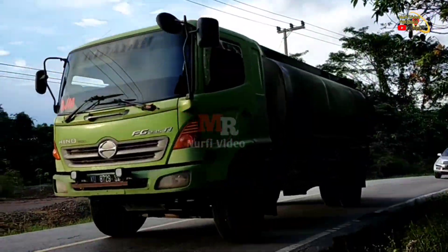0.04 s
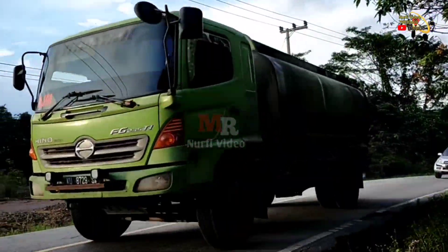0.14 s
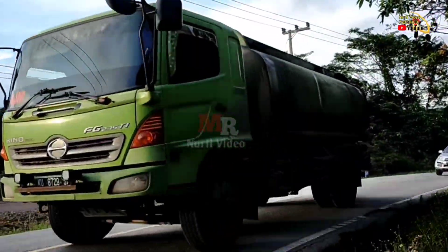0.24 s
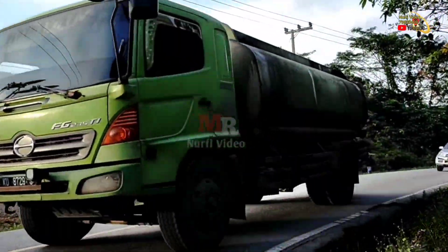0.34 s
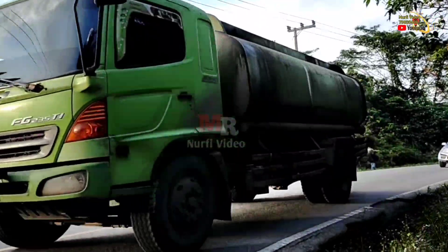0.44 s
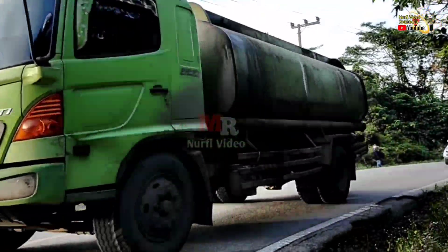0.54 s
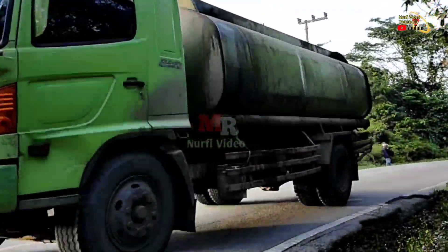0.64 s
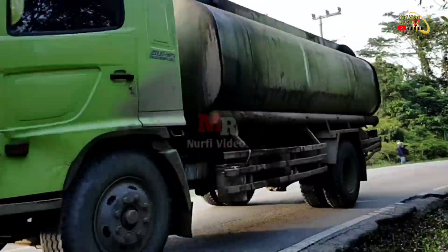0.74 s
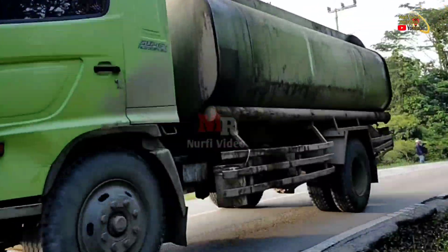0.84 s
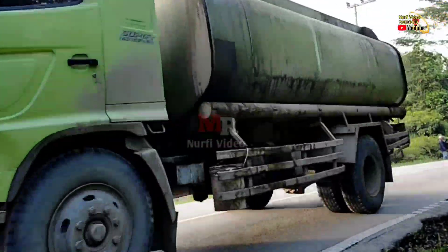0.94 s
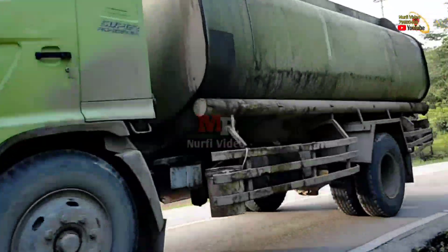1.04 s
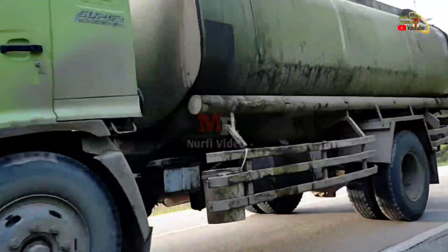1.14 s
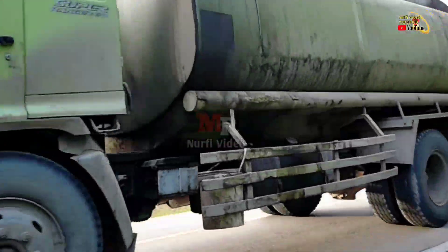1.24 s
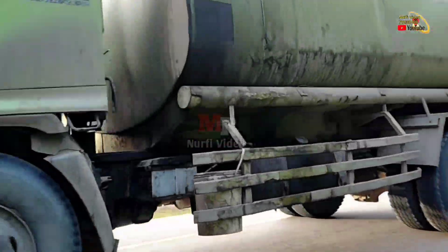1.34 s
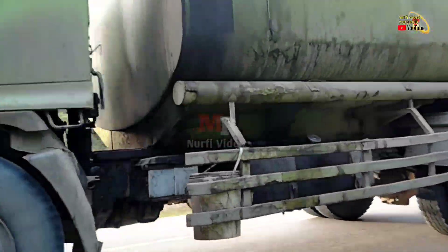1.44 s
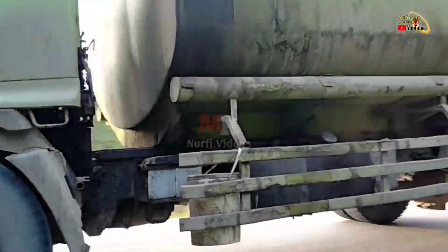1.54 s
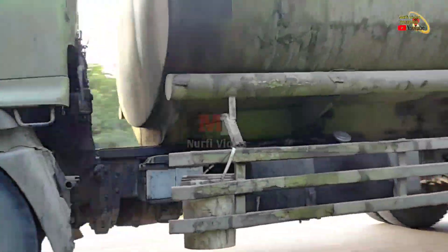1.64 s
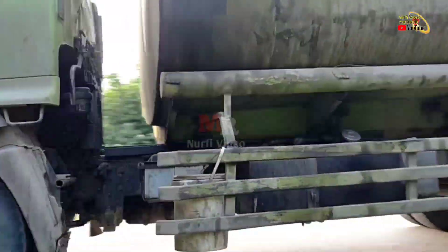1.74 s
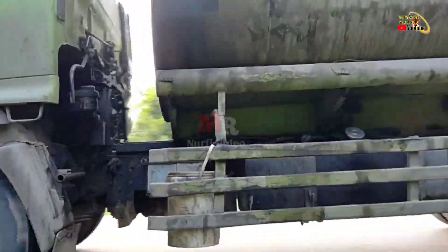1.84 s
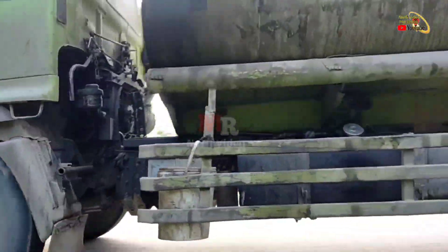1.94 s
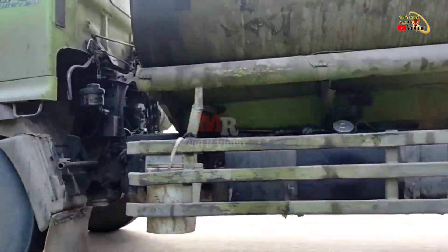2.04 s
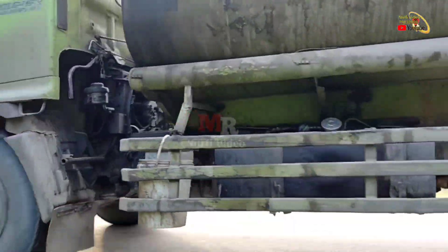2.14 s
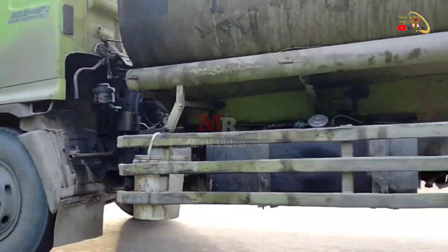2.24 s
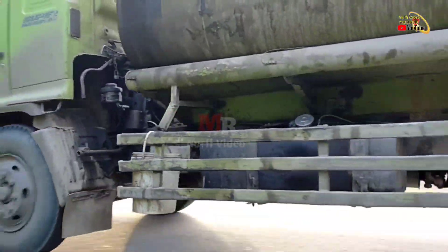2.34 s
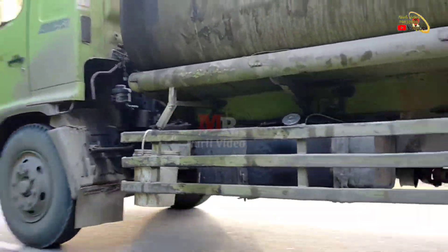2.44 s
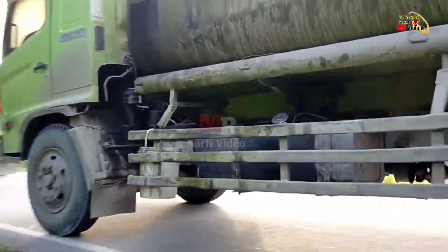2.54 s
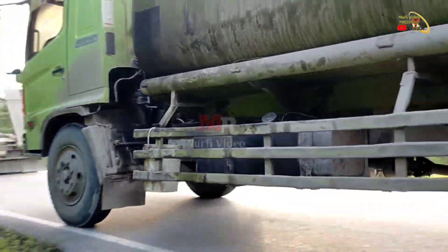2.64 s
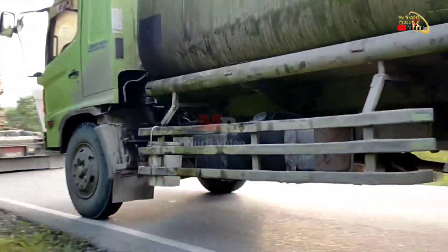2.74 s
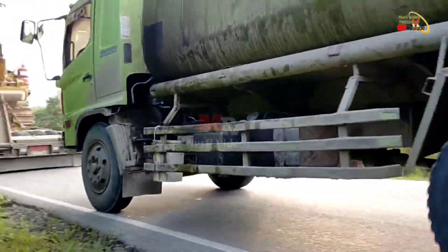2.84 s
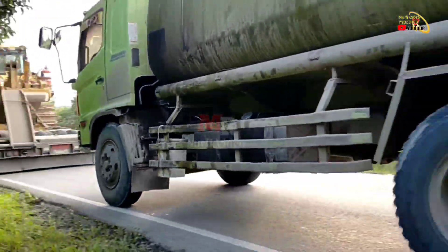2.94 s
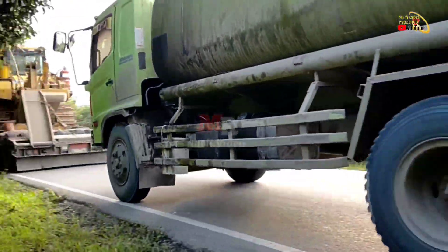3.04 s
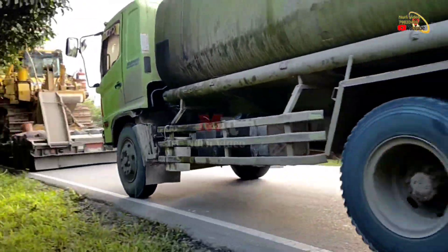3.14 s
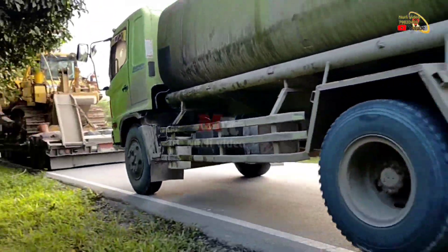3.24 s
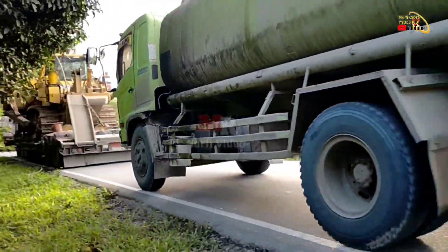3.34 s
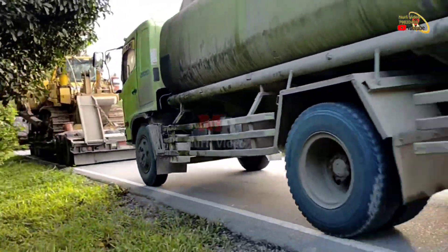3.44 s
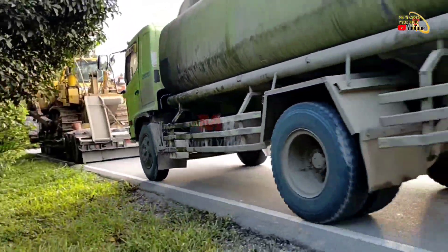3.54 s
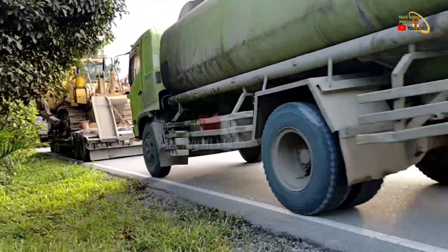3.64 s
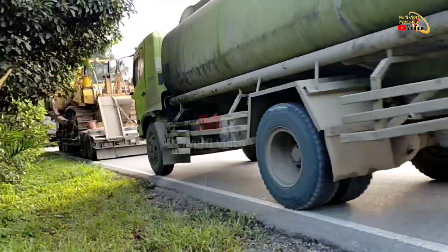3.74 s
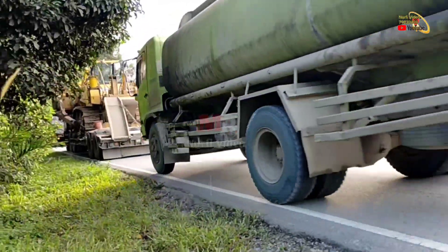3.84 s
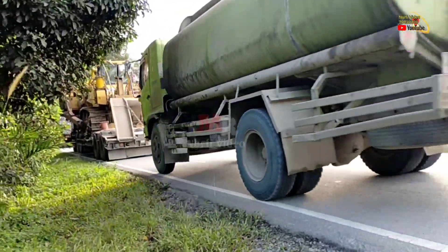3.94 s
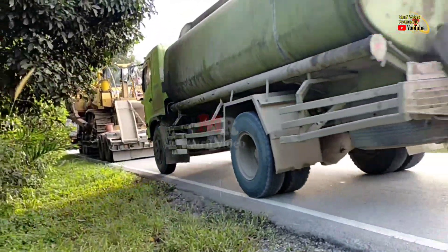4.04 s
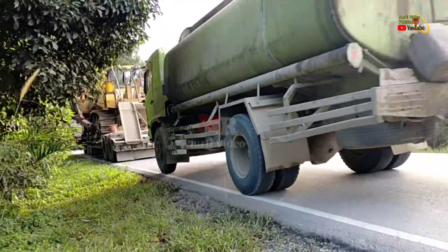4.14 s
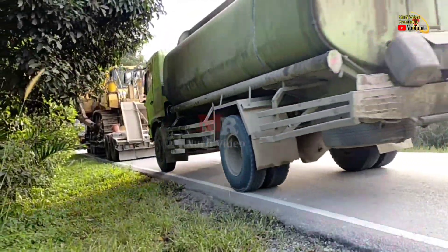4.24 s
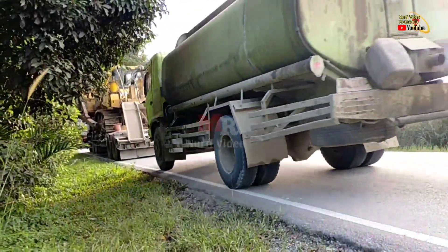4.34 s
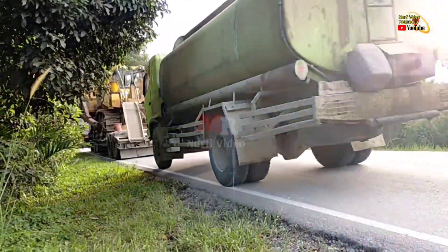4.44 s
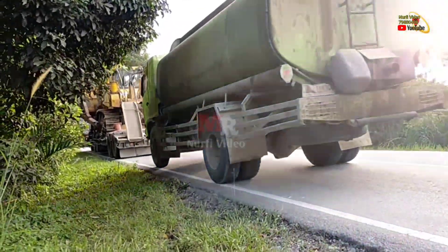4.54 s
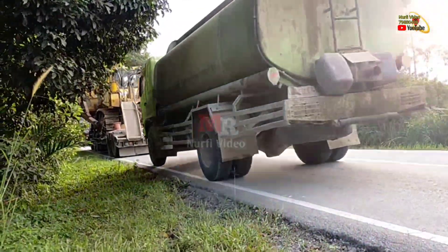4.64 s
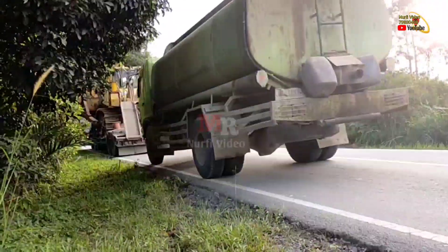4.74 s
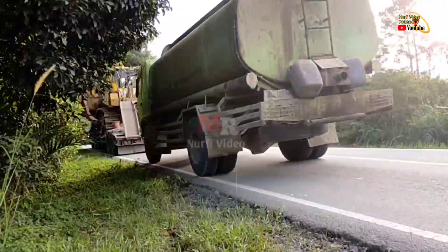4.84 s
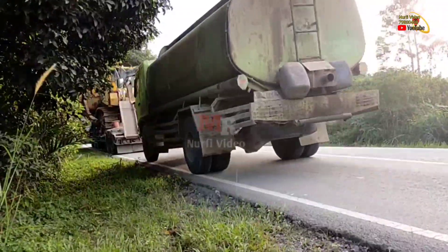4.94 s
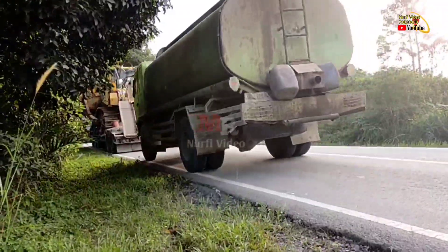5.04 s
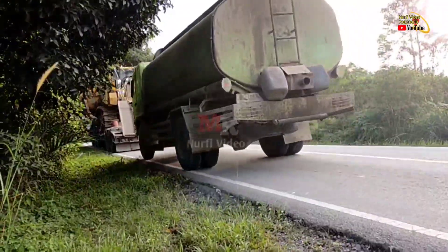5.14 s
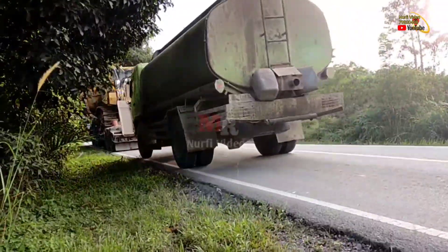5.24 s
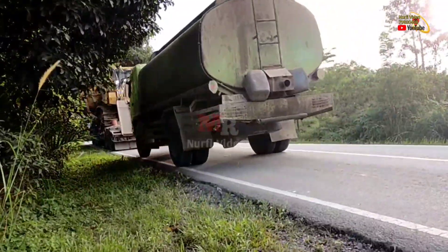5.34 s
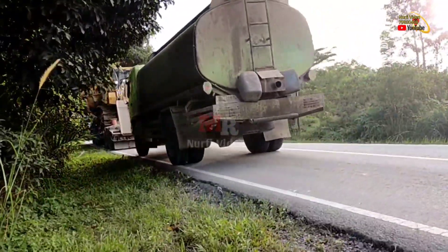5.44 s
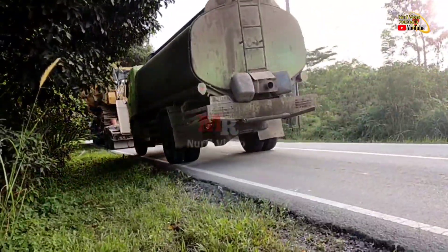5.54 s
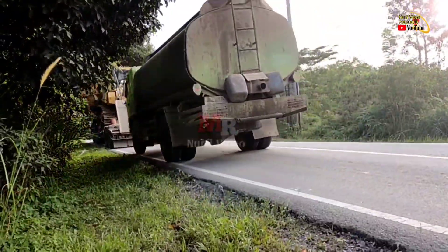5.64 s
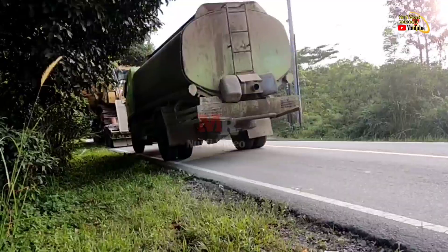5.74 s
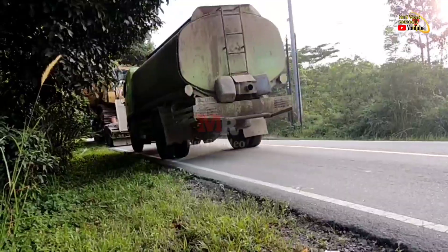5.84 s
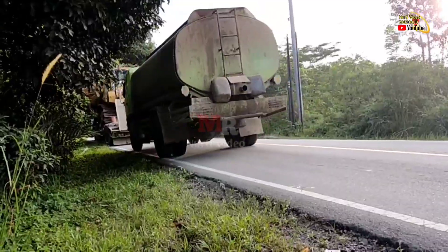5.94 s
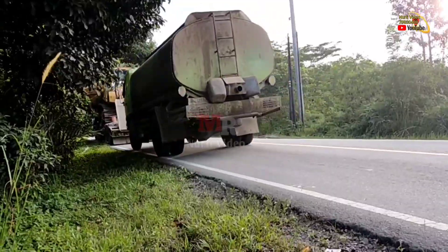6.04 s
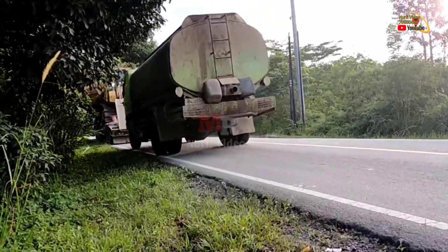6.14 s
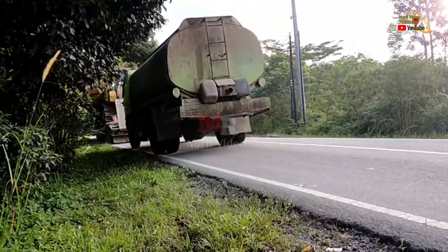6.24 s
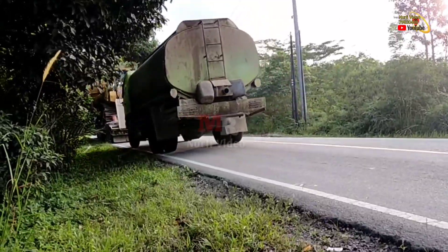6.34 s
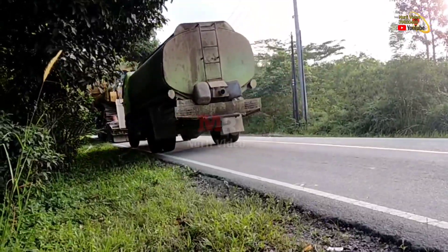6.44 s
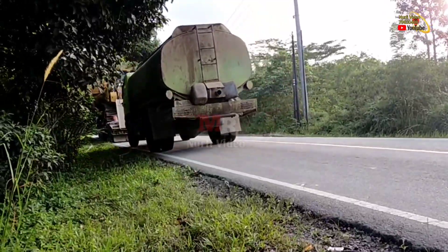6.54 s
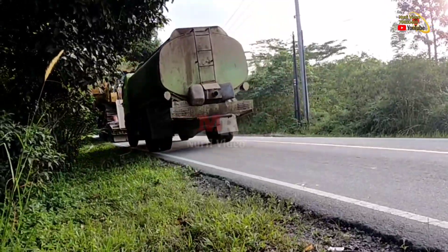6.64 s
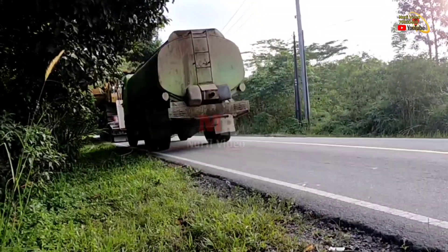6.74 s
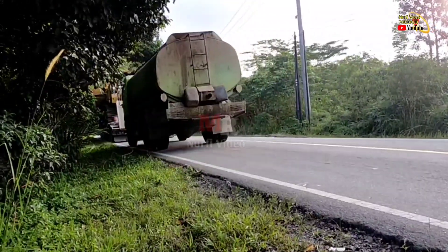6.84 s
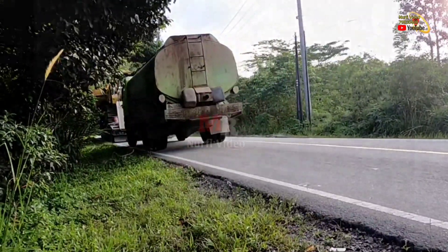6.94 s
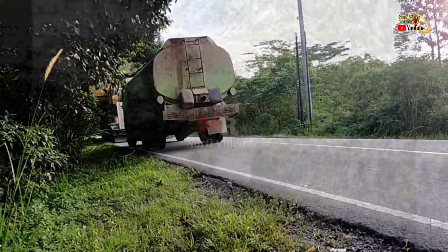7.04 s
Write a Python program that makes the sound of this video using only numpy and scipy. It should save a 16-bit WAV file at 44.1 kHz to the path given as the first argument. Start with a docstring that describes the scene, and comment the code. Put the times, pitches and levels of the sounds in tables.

```python
"""On the verge of a hill road, a diesel tanker labours past, close behind a second heavy truck.
Their exhaust notes lie a few hertz apart and beat while the tanker loses revs. Combustion knock
rings its block, the turbo hisses and whistles, and loose fittings rattle; then tailpipe and tyres
go by. A stone snaps under a tyre, an air valve vents, and a thin jet of air hisses in pulses."""
import sys
import numpy as np
from scipy import signal
from scipy.fft import rfft, irfft, next_fast_len
from scipy.io import wavfile

SR = 44100
rng = np.random.default_rng(int(sys.argv[2]) if len(sys.argv) > 2 else 0)


def wav_record(signal):
    """Record a signal, one row per channel, as 16-bit PCM in the file named by sys.argv[1]."""
    frames = np.transpose(np.atleast_2d(signal))
    bounded = np.clip(frames, -1, 1)
    # unit amplitude maps onto the largest positive 16-bit level
    quanta = np.round(bounded * 32767).astype(np.int16)
    wavfile.write(sys.argv[1], SR, quanta)


N = 311787
TIME = np.arange(N) / SR


def from_db(db):
    """Decibels to gain."""
    return 10 ** (np.asarray(db) / 20)


def unit_rms(x):
    """Scale to rms 1."""
    return x / np.sqrt(np.mean(x ** 2) + 1e-20)


def curve(rows):
    """Rows of (seconds, value), interpolated per sample."""
    return np.interp(TIME, *np.transpose(rows))


def drift(rate_hz):
    """Smooth random wander, spread 1."""
    step = 40
    pole = np.exp(-2 * np.pi * rate_hz * step / SR)
    slow = signal.lfilter([1], [1, -2 * pole, pole * pole], rng.standard_normal(N // step + 2002))[2000:]
    return np.interp(np.arange(N) / step, np.arange(len(slow)), unit_rms(slow))


def coloured(spectrum, source=None, rings=()):
    """A source (default white noise) through a body's spectrum and narrow rings; rms 1."""
    source = rng.standard_normal(N) if source is None else source
    size = next_fast_len(N)
    hz, db = np.transpose(spectrum)
    bin_hz = np.maximum(np.arange(size // 2 + 1) * SR / size, 1)
    octave = np.log2(bin_hz)
    octaves_outside = np.abs(octave - np.clip(octave, np.log2(hz[0]), np.log2(hz[-1])))
    shape_db = np.interp(octave, np.log2(hz), db) - 48 * octaves_outside
    for centre_hz, width_hz, boost_db in rings:
        shape_db += boost_db / (1 + (2 * (bin_hz - centre_hz) / width_hz) ** 2)
    return unit_rms(irfft(rfft(source, size) * from_db(shape_db), size)[:N])


def passing(at_s, peak_db, approach_s, leave_s, far_db):
    """Gain of a source going by: inverse distance over a floor of scattered sound."""
    away = (TIME - at_s) / np.where(TIME < at_s, approach_s, leave_s)
    return np.sqrt(from_db(peak_db) ** 2 / (1 + away ** 2) + from_db(far_db) ** 2)


def facing(at_s, width_s):
    """Bell from 0 to 1 and back while a part points at the verge."""
    return np.exp(-((TIME - at_s) / width_s) ** 2)


def swell(peak_s, hold_s, rise_db_per_s, fall_db_per_s):
    """Gain that rises to 1, holds and falls."""
    before_s, after_s = np.maximum(peak_s - TIME, 0), np.maximum(TIME - peak_s - hold_s, 0)
    return from_db(-rise_db_per_s * before_s - fall_db_per_s * after_s)


def orders(firings, table, waver_db, jitter_rad):
    """Crank-locked tones from (order, dB) rows; levels waver, and so does overtone phase."""
    tones = np.zeros(N)
    for order, db in table:
        gain = np.sqrt(2) * from_db(db + waver_db * drift(2.16))
        tones += gain * np.sin(2 * np.pi * order * firings + jitter_rad * (order - 1) * drift(4.8))
    return tones


def bursts(firings, decay_firings, depth, uneven_db):
    """One dying burst per firing over a steady part; cylinders and single firings differ."""
    index = firings.astype(int)
    cylinders = rng.standard_normal(6)
    strength = from_db(uneven_db * (cylinders[index % 6] + rng.standard_normal(1024)[index]))
    return 1 + depth * strength * np.exp(-(firings % 1) / decay_firings)


def firing_noise(firings, repeat_share):
    """Each of six cylinders repeats its own noise pattern; the rest is fresh noise."""
    index, sample = firings.astype(int), np.arange(N)
    onset = np.maximum.accumulate(sample * (np.diff(index, prepend=0) > 0))
    pattern = rng.standard_normal((6, 2048))[index % 6, sample - onset]
    return np.sqrt(repeat_share) * pattern + np.sqrt(1 - repeat_share) * rng.standard_normal(N)


def tanker_note(firings):
    """Exhaust note at the firing rate, its octave, and drive line hum."""
    note = orders(firings, [(1, 0)], waver_db=0.25, jitter_rad=0)
    note *= passing(at_s=3.23, peak_db=-15.45, approach_s=2.3, leave_s=.41, far_db=-50)
    octave = orders(firings, [(2, 0)], waver_db=1.0, jitter_rad=0.32)
    octave *= passing(at_s=2.1, peak_db=-27.8, approach_s=.55, leave_s=1.1, far_db=-40.5)
    hum = orders(firings, [(3.09, 0)], waver_db=1.5, jitter_rad=0.32)
    hum *= passing(at_s=2.1, peak_db=-34.3, approach_s=1.2, leave_s=1.25, far_db=-56)
    return note + octave + hum


# Exhaust overtones. Each row: multiple of the firing rate, relative level in dB.
RUMBLE_ORDERS = [(1.5, -13), (2.5, -16.5), (3, -18)]
TAILPIPE_ORDERS = [(3.92, -3.5), (4.5, -16.5), (5, -17), (5.5, -15.5), (5.75, -13.5), (6, -19), (7.8, -19)]
# Gas puff spectra. Each row: frequency in Hz, relative level in dB.
RUMBLE_SPECTRUM = [(20, -16), (35, -4), (48, -5), (65, -18), (88, -2.5), (130, -3.5), (185, -6.5),
                   (225, -18.5), (400, -43)]
CHUFF_SPECTRUM = [(150, -12), (225, -1.5), (270, -3.5), (335, 1), (400, -6.5), (480, -12), (800, -22)]


def tanker_exhaust(firings):
    """Gas puffs rumble and chuff under the overtones; the chuff lifts as the pipe faces the verge."""
    puffs = bursts(firings, decay_firings=0.36, depth=0.96, uneven_db=2.5)
    puffs *= firing_noise(firings, repeat_share=0.16)
    rumble = orders(firings, RUMBLE_ORDERS, waver_db=3.1, jitter_rad=0.13)
    rumble += from_db(-3) * coloured(RUMBLE_SPECTRUM, puffs)
    rumble *= passing(at_s=2.15, peak_db=-29.8, approach_s=1.3, leave_s=1.35, far_db=-34)
    pipe_tones = orders(firings, TAILPIPE_ORDERS, waver_db=1.5, jitter_rad=0.077)
    pipe_tones *= passing(at_s=2.45, peak_db=-29, approach_s=.09, leave_s=.22, far_db=-47)
    chuff = from_db(-4 + 3.5 * facing(at_s=2.5, width_s=.25)) * coloured(CHUFF_SPECTRUM, puffs)
    chuff *= passing(at_s=2.85, peak_db=-32.2, approach_s=2.8, leave_s=.55, far_db=-43.8)
    return rumble + pipe_tones + chuff


# Second engine's speed. Each row: time in seconds, firing rate in Hz.
SECOND_FIRING_HZ = [(0, 73.15), (.8, 70.56), (2.4, 67.29), (3.7, 61.82), (4.9, 59.62), (6.4, 60.55),
                    (7.07, 59.53)]
# Its note climbing away. Each row: time in seconds, gain in dB.
SECOND_GAIN_DB = [(0, -23), (.4, -20.2), (3.0, -25.9), (6.45, -26.6), (7.07, -32.5)]
# Its exhaust tones. Each row: multiple of the firing rate, relative level in dB.
SECOND_ORDERS = [(1, 0.5), (2.5, -26), (3, -23.5)]


def second_truck():
    """A deep note just above the tanker's; its rough octave emerges from behind the tanker."""
    firings = np.cumsum(curve(SECOND_FIRING_HZ)) / SR
    note = orders(firings, SECOND_ORDERS, waver_db=0.86, jitter_rad=0.25)
    growl = orders(firings, [(1.96, -0.89)], waver_db=3.5, jitter_rad=0.99)
    growl *= passing(at_s=1.75, peak_db=-35.8, approach_s=.3, leave_s=5.5, far_db=-45)
    return from_db(curve(SECOND_GAIN_DB)) * note + growl


# Engine spectra from three sides. Each row: frequency in Hz, relative level in dB.
FRONT_SPECTRUM = [(250, -9), (380, -5), (540, -7.5), (680, 1), (830, -1), (960, 0.5), (1300, -1),
                  (1600, -5), (2170, -5.5), (2640, -12.5), (3670, -14.5), (4300, -20), (5000, -22),
                  (6600, -24.5)]
BAY_SPECTRUM = [(250, -6), (380, -8.5), (515, -9.5), (760, -1.5), (1010, 1), (1170, -3), (1320, -1.5),
                (1490, -4), (2090, -2), (2700, -13.5), (4680, -20), (5490, -25.5), (6600, -26.5)]
REAR_SPECTRUM = [(250, -14), (380, -14), (470, -8.5), (560, -7), (660, 0), (850, -2.5), (1000, -8),
                 (1200, -5), (1620, -8.5), (2040, -9.5), (3000, -16.5), (4040, -22), (5000, -29.5),
                 (6200, -35)]
# Rings of block and covers. Each row: centre in Hz, width in Hz, boost in dB.
BLOCK_RINGS = [(720, 41, 1), (942, 59, 2), (1135, 60, -0.5), (1333, 26, -0.5), (1670, 41, -1),
               (2230, 69, 1)]


def clatter(firings, rear):
    """Combustion knock rings the block, heard through the cab front, the open bay, then from behind."""
    knock = bursts(firings, decay_firings=0.09, depth=0.4, uneven_db=2.5) * from_db(0.53 * drift(20))
    knock *= firing_noise(firings, repeat_share=0.28)
    bay = facing(at_s=2.22, width_s=.72)
    front = np.clip(1 - bay - rear, 0, 1)
    sides = [(front, FRONT_SPECTRUM), (bay, BAY_SPECTRUM), (rear, REAR_SPECTRUM)]
    block = sum(share * coloured(spectrum, knock, BLOCK_RINGS) for share, spectrum in sides)
    return road_comb(block) * passing(at_s=1.85, peak_db=-25.3, approach_s=1.5, leave_s=.66, far_db=-42)


def road_comb(direct):
    """Sweeping comb of the asphalt bounce: a weaker copy, shifted most when the engine is nearest."""
    nearest_s, passing_s = 1.99, 1.8
    lead_s = 0.06 / np.hypot(1, (TIME - nearest_s) / passing_s)
    return direct + from_db(-11.5) * np.interp(TIME + lead_s, TIME, direct)


# Compressor hiss spectra. Each row: frequency in Hz, relative level in dB.
HISS_FRONT_SPECTRUM = [(4500, -21), (6000, -13), (6900, -8), (7450, 0.5), (8100, 1), (8600, -3),
                       (9800, -12), (11300, -8), (12300, -6.5), (12800, -1), (15500, -2)]
HISS_REAR_SPECTRUM = [(4500, -6), (6000, -8), (6900, -6.5), (7450, 1), (8050, -0.5), (8800, -10),
                      (10500, -11), (12000, -9.5), (14100, -3), (15500, -4.5)]
# Turbo and gear whistles. Each row: centre in Hz, width in Hz, relative level in dB.
WHISTLES = [(3800, 70, -6), (4450, 55, -1), (8090, 50, -3), (11890, 80, 0), (12900, 200, -3)]
# Whistles beaming at the verge. Each row: peak time in seconds, hold in seconds, gain in dB.
SQUEALS = [(.82, .03, -54), (1.02, .05, -48.5), (1.13, .1, -44.5), (1.3, .02, -42.5), (1.47, .5, -51.5)]


def turbo(firings, rear):
    """Air rushes through the compressor; faint whistles squeal as they beam sideways."""
    rush = bursts(firings, decay_firings=0.46, depth=0.12, uneven_db=5.5) * from_db(0.63 * drift(5.9))
    rush *= rng.standard_normal(N)
    hiss = (1 - rear) * coloured(HISS_FRONT_SPECTRUM, rush) + rear * coloured(HISS_REAR_SPECTRUM, rush)
    whistles = sum(from_db(db) * whistle(hz, width_hz) for hz, width_hz, db in WHISTLES)
    beam = np.max([from_db(db) * swell(peak_s, hold_s, rise_db_per_s=110, fall_db_per_s=140)
                   for peak_s, hold_s, db in SQUEALS], axis=0)
    gain = passing(at_s=1.84, peak_db=-40.8, approach_s=1.8, leave_s=.5, far_db=-54.8)
    return from_db(4) * gain * hiss + np.maximum(beam, from_db(-19) * gain) * whistles


def whistle(hz, width_hz):
    """Unsteady tone: a narrow band of noise."""
    phase = 2 * np.pi * hz * TIME
    return drift(width_hz) * np.cos(phase) + drift(width_hz) * np.sin(phase)


def ring(clicks, modes):
    """Clicks ring the modes of a body too small to radiate bass."""
    ringing = np.zeros(N)
    for hz, db, t60_s in modes:
        radius, angle = from_db(-60 / (t60_s * SR)), 2 * np.pi * hz / SR
        feedback = [1, -2 * radius * np.cos(angle), radius ** 2]
        ringing += from_db(db) * signal.lfilter([0, np.sin(angle)], feedback, clicks + 1e-18)
    return signal.sosfilt(signal.butter(2, 450, "high", fs=SR, output="sos"), ringing)


# Bumps. Each row: start in seconds, contact strength limit in dB.
BUMPS = [(1.41, -28), (1.83, -36), (1.93, -34), (2.92, -36), (4.07, -37), (4.13, -43), (5.95, -46)]
# Chassis fitting modes. Each row: frequency in Hz, gain in dB, T60 in seconds.
FITTING_MODES = [(664, -1, .12), (753, -2, .1), (1277, 2.5, 0.11), (1370, -3, .07), (1700, -9, 0.066),
                 (2040, -9, .05)]


def rattles():
    """Loose fittings chatter in a short flurry of contacts at each bump."""
    flurry_s, contacts = .06, 14
    clicks = np.zeros(N)
    for start_s, db in BUMPS:
        delay, strength = rng.random((2, contacts))
        clicks[((start_s + flurry_s * delay) * SR).astype(int)] = from_db(db) * (2 * strength - 1)
    return ring(clicks, FITTING_MODES)


# Tyre roar spectrum. Each row: frequency in Hz, relative level in dB.
TYRE_SPECTRUM = [(500, -14), (680, 0), (850, -.5), (1100, -8), (2000, -7), (2800, -20), (6300, -36),
                 (7900, -18), (9000, -30)]


def tyres():
    """The rear tyres roar as they roll past."""
    gain = passing(at_s=3.15, peak_db=-37, approach_s=.2, leave_s=.4, far_db=-70)
    return gain * coloured(TYRE_SPECTRUM)


# Stone modes. Each row: frequency in Hz, gain in dB, T60 in seconds.
STONE_MODES = [(720, -13, .008), (1190, 4.5, .003), (2200, -19, 0.0022), (8000, -14, .0008),
               (13000, -7, .0008)]


def stone_snap(at_s):
    """A stone snaps under a tyre: one click, ringing for milliseconds."""
    click = np.zeros(N)
    click[round(at_s * SR)] = from_db(-13.5)
    return ring(click, STONE_MODES)


# Venting air spectrum. Each row: frequency in Hz, relative level in dB.
VENT_SPECTRUM = [(6000, -30), (7600, -3), (9200, -11), (9900, -2), (10800, -8), (12200, -4), (14400, 0),
                 (15500, -4)]


def air_valve(peak_s):
    """A valve opens, vents hissing air and closes."""
    open_s, hold_s, close_s = .105, .05, .18
    shut = np.maximum(peak_s - TIME, 0) / open_s + np.maximum(TIME - peak_s - hold_s, 0) / close_s
    return from_db(-40.3) * np.exp(-shut ** 2) * coloured(VENT_SPECTRUM)


def air_jet(peak_s):
    """A thin jet hisses in quick, unsteady pulses; its pitch sags as the pressure drops."""
    pulse_hz, jet_hz, sag_hz_per_s = 70, 13520, 850
    pulses = 1 + 0.22 * np.sin(2 * np.pi * pulse_hz * TIME + .6 * drift(3))
    pulses = unit_rms(pulses * from_db(1.3 * drift(25)))
    sidebands = coloured([(20, 2.5), (350, -8), (800, -9), (1600, -16)])
    centre_hz = jet_hz - sag_hz_per_s * (TIME - peak_s)
    jet = np.sqrt(2) * sidebands * np.cos(2 * np.pi * np.cumsum(centre_hz) / SR)
    return from_db(-47.3) * swell(peak_s, hold_s=.08, rise_db_per_s=21, fall_db_per_s=10) * pulses * jet


# Tanker's engine speed, sagging on the hill. Each row: time in seconds, firing rate in Hz.
TANKER_FIRING_HZ = [(0, 64.0), (1.8, 61.03), (3.7, 56.06), (4.8, 52.0), (5.8, 48.59), (7.07, 46.83)]


def scene():
    """Both trucks in mono; the tanker's engine and exhaust follow one running count of firings."""
    firings = np.cumsum(curve(TANKER_FIRING_HZ)) / SR
    rear_s, turn_s = 3.05, .36
    rear = 1 / (1 + np.exp((rear_s - TIME) / turn_s))   # share heard from behind
    tank_screening = from_db(-1.2 * facing(at_s=4.55, width_s=.42))
    engine = tank_screening * (clatter(firings, rear) + turbo(firings, rear))
    exhausts = tanker_note(firings) + tanker_exhaust(firings) + second_truck()
    air = air_valve(peak_s=5.3) + air_jet(peak_s=6.41)
    road = rattles() + tyres() + stone_snap(at_s=5.0485)
    return (engine + exhausts + air + road)[None]


def record(dry):
    """Steep low-pass on the top treble."""
    cutoff_hz = 15480
    return signal.sosfilt(signal.ellip(14, .1, 90, cutoff_hz, fs=SR, output="sos"), dry)


dry = scene()
out = record(dry)
wav_record(out)
```